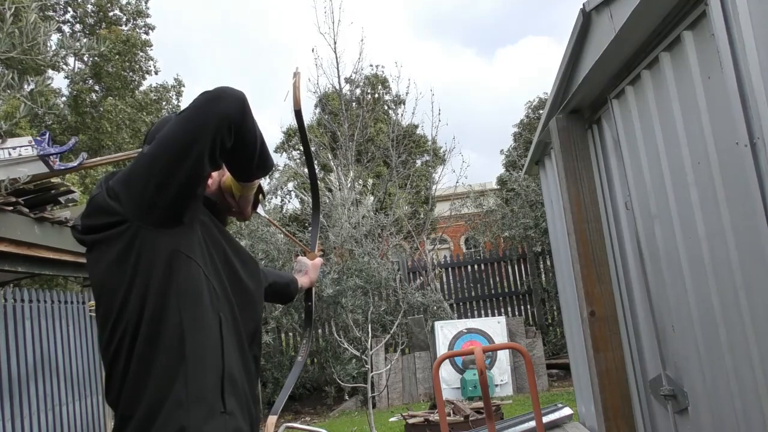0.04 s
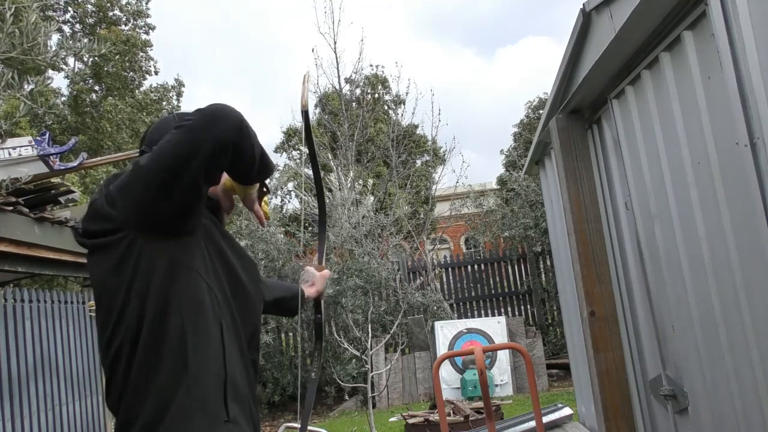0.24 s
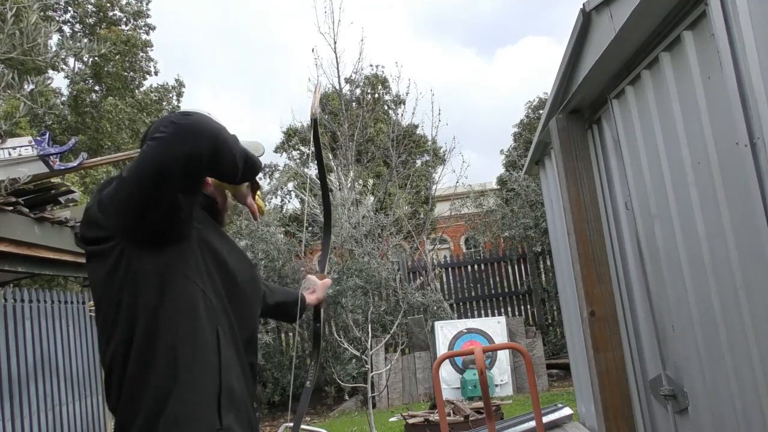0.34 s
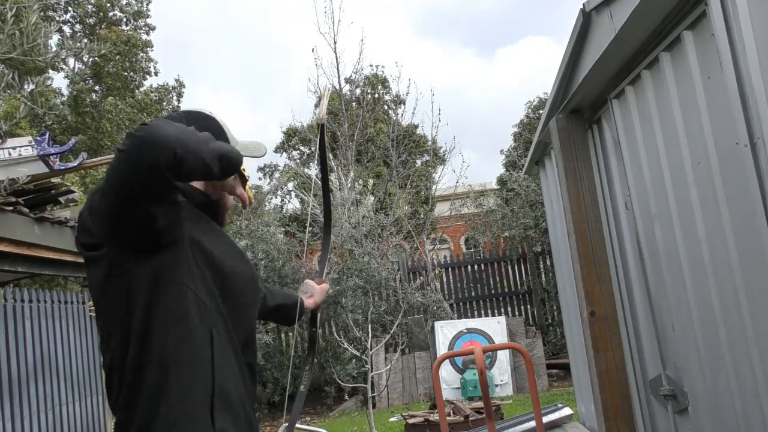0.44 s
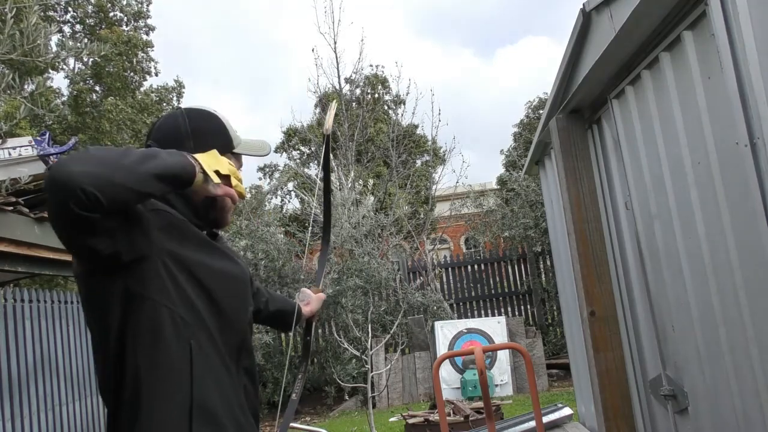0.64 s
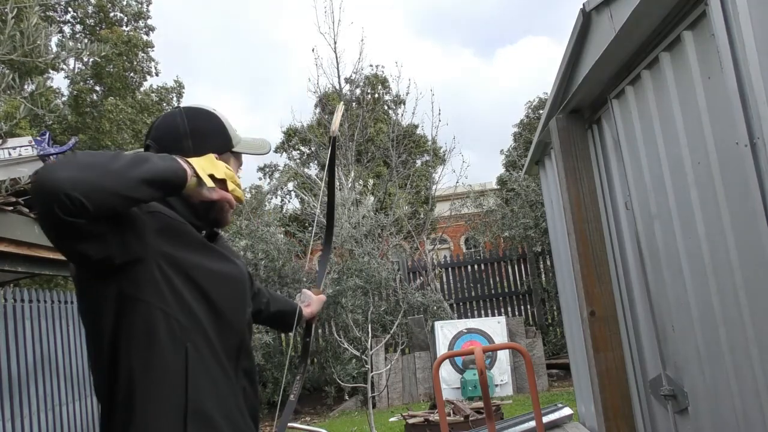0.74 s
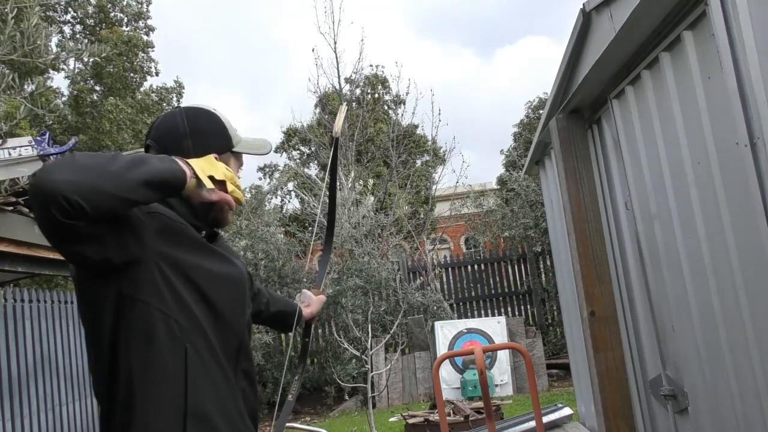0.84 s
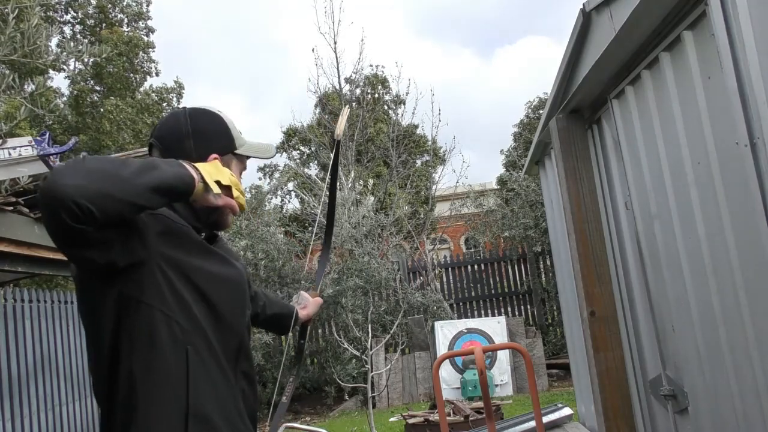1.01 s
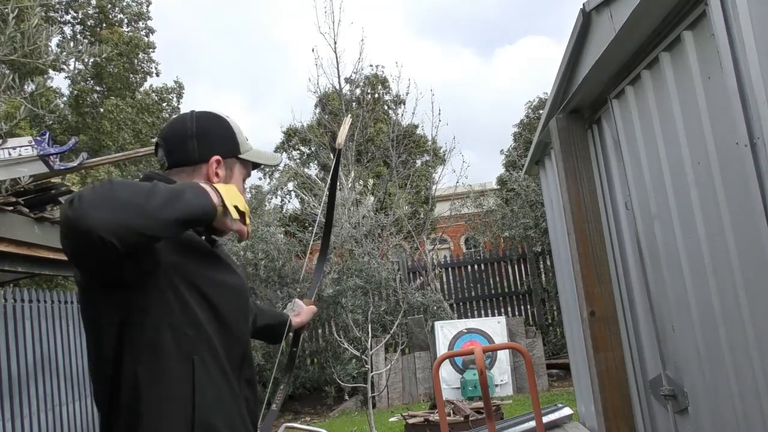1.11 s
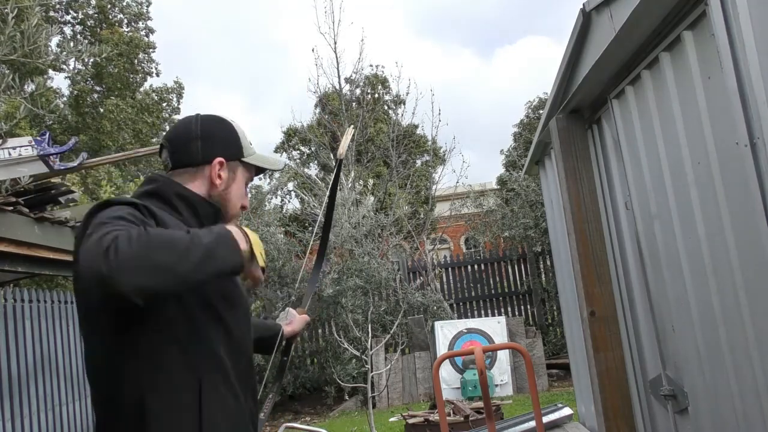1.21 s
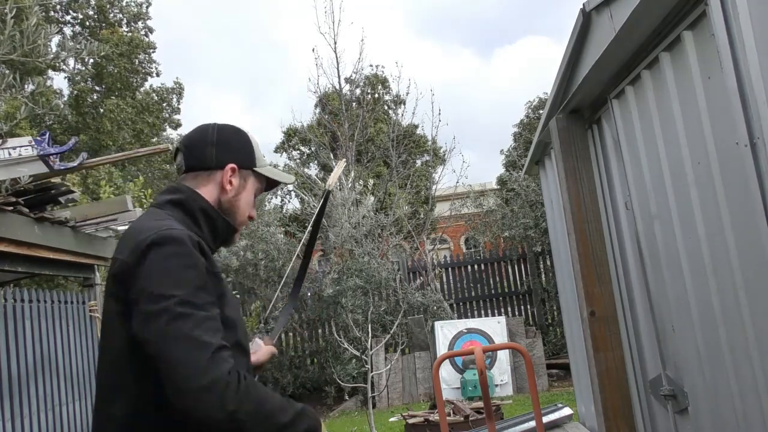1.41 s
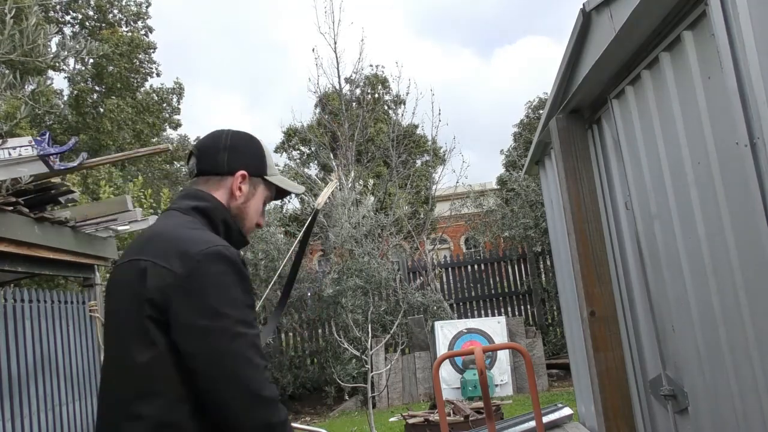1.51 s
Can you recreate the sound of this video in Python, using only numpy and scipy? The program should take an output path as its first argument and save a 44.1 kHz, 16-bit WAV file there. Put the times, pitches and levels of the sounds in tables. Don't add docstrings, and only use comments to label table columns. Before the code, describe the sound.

A bow string snaps on release and the arrow thumps hard into a hollow backyard target

```python
import sys
import numpy as np
from scipy import signal
from scipy.fft import rfft, irfft
from scipy.io import wavfile
from scipy.ndimage import uniform_filter1d

SR = 44100
rng = np.random.default_rng(int(sys.argv[2]) if len(sys.argv) > 2 else 0)


def volts_from_db(level):
    exponent = np.asarray(level, float) / 20
    return 10 ** exponent


def waveform_to_disk(signal):
    frames = np.transpose(np.atleast_2d(signal))
    scaled = np.clip(frames, -1, 1) * 32767
    samples = np.round(scaled).astype(np.int16)
    wavfile.write(sys.argv[1], SR, samples)


N = 68355


def unit(x):
    return x / np.sqrt(np.mean(x ** 2) + 1e-20)


def along(points, hz):
    f, v = np.transpose(points)
    return np.interp(np.log(hz + 1), np.log(f + 1), v)


def closed(points):
    return [(points[0][0] / 2, -90)] + list(points) + [(points[-1][0] * 2, -90)]


def colour(x, points):
    gain = volts_from_db(along(closed(points), np.fft.rfftfreq(4096, 1 / SR)))
    cepstrum = irfft(np.log(gain))
    cepstrum[1:2048] *= 2
    cepstrum[2049:] = 0
    h = irfft(np.exp(rfft(cepstrum)))
    return signal.fftconvolve(x, h / np.linalg.norm(h))[:len(x)]


def add(track, s, x):
    part = track[round(s * SR):][:len(x)]
    part += x[:len(part)]


def burst(t60, rise=0, blow=0):
    t = np.arange(SR // 2) / SR
    swell = 1 - np.exp(-(t + 1 / SR) / (rise + 1e-5))
    x = rng.standard_normal(len(t)) * volts_from_db(-60 * t / t60) * swell
    return x - blow * (t == 0)


def ring(modes):
    t = np.arange(SR // 2) / SR
    return sum(volts_from_db(db - 60 * t / t60) * np.sin(2 * np.pi * hz * t) for hz, db, t60 in modes)


def wide(a, b, width):
    return np.array([a + width * b, a - width * b])


def rush(points, patchy_db):
    # f/Hz, correlation
    alike = [(30, 0.15), (100, 0.56), (1000, 0.78), (5000, 0.6), (6300, 0.94), (8500, 0.91), (12000, 0.85)]
    hz, _, z = signal.stft(rng.standard_normal((2, N)), SR, nperseg=1024)
    field = uniform_filter1d(rng.standard_normal(z.shape[1:]), size=8, axis=0)
    field = uniform_filter1d(field, size=5, axis=1)
    turn = np.arccos(np.clip(along(alike, hz), -1, 1)) / 2
    mid_side_gain = volts_from_db(along(closed(points), hz)) * [np.cos(turn), np.sin(turn)]
    z = z * volts_from_db(patchy_db * unit(field)) * mid_side_gain[..., None]
    mid, side = signal.istft(z, nperseg=1024)[1][:, :N]
    return unit(np.array([mid + side, mid - side]))


def room(x, t60s, gap_s, alike):
    hz, t, z = signal.stft(rng.standard_normal((2, SR // 2)), SR, nperseg=256)
    a, b = signal.istft(z * volts_from_db(-60 * t / along(t60s, hz)[:, None]), SR, nperseg=256)[1]
    b = colour(b, [(40, -9.5), (4500, -3.5), (6500, -24)])
    tail = wide(a, unit(b) * a.std(), 1 - alike)
    tail = tail / np.linalg.norm(tail[0])
    delayed = np.pad(x, (round(gap_s * SR), 0))
    return signal.fftconvolve(delayed[None], tail, axes=1)[:, :N]


def town_floor():
    # f/Hz, level/dB
    rumble = [(25, -23), (104, -5.5), (420, -10.5), (600, -17.5), (800, -24.5), (1050, -14), (1600, -15.5),
              (2500, -29)]
    # f/Hz, level/dB
    hiss = [(2000, 5), (6000, -2.5), (9000, -6.5), (13000, -7.5), (16000, -19)]
    return volts_from_db(-53.5) * rush(rumble, patchy_db=3) + volts_from_db(-55.5) * rush(hiss, patchy_db=0.7)


def wind():
    # t/s, level/dB, t60/s
    gusts = [(0, -51, 0.097), (0.884, -48, 0.061), (1.051, -48, 0.37), (1.151, -52, 0.083),
             (1.34, -52, 0.098)]
    # f/Hz, level/dB
    gust_tone = [(25, 16), (80, 11), (160, 7.5), (300, -18)]
    ports = np.zeros((2, N))
    for s, db, t60 in gusts:
        for port in ports:
            add(port, s, volts_from_db(db + 9.5) * burst(t60, rise=0.011))
    return np.array([colour(port, gust_tone) for port in ports]) * volts_from_db([[1.5], [-1.5]])


def whistle(length_s, from_hz, to_hz):
    u = np.linspace(0, 1, max(round(length_s * SR), 2))
    wobble = unit(uniform_filter1d(rng.standard_normal(SR // 4), size=130))[:len(u)]
    hz = (from_hz + (to_hz - from_hz) * u) * (1 + 0.014 * wobble)
    return np.sin(np.pi * u) ** 0.5 * np.sin(2 * np.pi * np.cumsum(hz) / SR) * np.sqrt(2)


def birds():
    # t/s, length/s, from f/Hz, to f/Hz, level/dB
    notes = [(.012, 0.017, 3840, 3800, -55), (0.025, 0.059, 4420, 5160, -53.5),
             (0.082, .025, 4750, 4600, -55), (.108, .03, 4250, 4210, -52), (.122, .045, 3360, 3650, -49),
             (0.167, .015, 4600, 4470, -55), (0.18, 0.043, 4250, 4050, -54),
             (0.185, 0.024, 3350, 3620, -52), (0.505, 0.019, 3350, 3590, -45), (.53, .014, 3070, 3030, -50),
             (0.536, 0.051, 3480, 3590, -46), (0.556, 0.021, 4270, 4190, -48.5),
             (0.584, 0.039, 3600, 3215, -50), (0.623, 0.0417, 3225, 3070, -49.5),
             (.675, .025, 3100, 3120, -49.5), (0.696, 0.044, 5280, 4520, -53.5),
             (.705, 0.045, 6180, 5750, -56.5), (0.876, 0.029, 5230, 5270, -53),
             (1.003, 0.018, 4150, 4110, -49.5), (1.063, 0.043, 4735, 4600, -52),
             (1.107, 0.083, 3503, 3684, -51), (0.372, .02, 5000, 5000, -51),
             (1.253, 0.023, 3800, 3100, -48), (1.292, 0.021, 3656, 3910, -46),
             (1.334, 0.029, 5290, 5260, -51.5), (1.389, 0.021, 5010, 3520, -46),
             (1.419, 0.019, 3454, 3970, -42.5), (1.425, 0.034, 4550, 4756, -44),
             (1.44, 0.011, 3645, 3600, -44), (1.45, 0.043, 4700, 4660, -51.5)]
    # t/s, level/dB
    chorus = [(0, -47), (.4, -47.5), (.62, -48.5), (0.821, -54.5), (1.0, -52.5), (1.12, -49), (1.21, -51.5),
              (1.28, -46), (1.42, -48), (1.55, -55)]
    # f/Hz, level/dB
    flock_tone = [(2400, -48), (2900, -3.5), (3500, 0), (4600, -3.5), (5500, -10.5), (6500, -25.5)]
    # t/s, half of left minus right/dB
    flock_pan = [(0, -3), (.3, -3.5), (.9, -2), (1.2, -3), (1.55, -2)]
    near, far = np.zeros((2, N))
    for s, length_s, from_hz, to_hz, db in notes:
        add(near, s, volts_from_db(db) * whistle(length_s, from_hz, to_hz))
    for when, long, pitch, glide in rng.random((160, 4)):
        hz = 2900 + 2600 * pitch
        chirp = whistle(0.0117 + 0.0298 * long, hz, hz * (0.88 + 0.2287 * glide))
        add(far, when * N / SR, volts_from_db(along(flock_tone, hz)) * chirp)
    chirps = unit(room(far, [(4000, 0.39)], gap_s=0, alike=0.58))
    flock = rush(flock_tone, patchy_db=5.0) + volts_from_db(-3) * chirps
    trees = volts_from_db(-8) * room(near, [(4000, 0.2)], gap_s=0.012, alike=0.51)
    t = np.arange(N) / SR
    flock_db = np.interp(t, *np.transpose(chorus)) - 0.5
    pan_db = np.interp(t, *np.transpose(flock_pan))
    return volts_from_db([pan_db, -pan_db]) * (near + trees + volts_from_db(flock_db) * flock)


def jacket():
    # t/s, level/dB, rise/s, t60/s
    rustles = [(0.581, -48, .012, 0.16), (0.757, -34.5, 0.002, 0.14), (0.773, -33, 0.0015, 0.18),
               (0.887, -44.5, 0.026, 0.33), (0.927, -40.5, 0.006, 0.095), (1.22, -42.5, 0.0095, 0.1)]
    # f/Hz, level/dB
    cloth_tone = [(470, -61), (800, -6), (1000, -5), (1850, 4), (2040, 1), (2460, 1.5), (10700, 6.5),
                  (15800, 1)]
    # t/s, peak level/dB
    tick_events = [(1.0028, -40.5), (1.0244, -36)]
    # f/Hz, level/dB
    tick_tone = [(5000, -6), (8000, -12), (12000, 2), (15500, -15)]
    # t/s, level/dB, t60/s
    knock_events = [(0.9151, -31, 0.028), (1.146, -34.5, 0.028)]
    # f/Hz, level/dB
    knock_tone = [(280, 8), (450, 6), (1100, 1), (1600, -10)]
    x, other, ticks, knocks = np.zeros((4, N))
    for s, db, rise, t60 in rustles:
        add(x, s, volts_from_db(db) * burst(t60, rise))
        add(other, s, volts_from_db(db) * burst(t60, rise))
    for s, db in tick_events:
        add(ticks, s, volts_from_db(db) * burst(0.011, blow=3.3))
    for s, db, t60 in knock_events:
        add(knocks, s, volts_from_db(db) * burst(t60, rise=0.0058))
    grain = unit(volts_from_db(1.5 * unit(uniform_filter1d(rng.standard_normal(N), size=60))))
    cloth = wide(colour(x * grain, cloth_tone), colour(other * grain, cloth_tone), 0.27)
    return cloth + volts_from_db([[1.2], [-1.2]]) * colour(ticks, tick_tone) + colour(knocks, knock_tone)


def booms():
    # t/s, peak level/dB, f/Hz, swell/s
    pushes = [(0.429, -12, 128.8, .011), (0.464, -19.5, 163.4, 0.011), (0.496, -27.5, 155, 0.01),
              (.52, -41, 136, 0.013), (0.545, -33, 146, 0.01), (0.575, -31.5, 229, 0.0079),
              (0.582, -35, 111, 0.01), (0.604, -34, 254, 0.012), (0.623, -22.5, 146.8, 0.0097),
              (0.661, -30.5, 133, 0.0044), (0.682, -33, 140, 0.0055), (.75, -47, 183.4, 0.024),
              (.772, -41, 137, 0.008), (1.075, -44, 103.5, 0.011), (1.12, -40.5, 81, .009)]
    x, t = np.zeros(N), np.arange(SR // 4) / SR
    for s, db, hz, swell in pushes:
        u = t / swell
        add(x, s, -volts_from_db(db) * u ** 2 * np.exp(2 - 2 * u) * np.sin(2 * np.pi * hz * t))
    return x


def target():
    # t/s, level/dB, t60/s
    layers = [
        (0.4278, -18.5, 0.0059),
        (.4314, -21, 0.008),
        (.4327, -19.5, 0.0065),
        (0.436, -24.5, 0.0052),
    ]
    # f/Hz, level/dB
    hit_tone = [(600, -9), (1000, -18), (1500, -2.5), (2600, 0.5), (3900, -0.5), (4700, -19), (5800, -13),
                (15500, -33)]
    # f/Hz, level/dB, t60/s
    face_modes = [(332, -17.5, 0.063), (387, -26.5, 0.14), (428, -38, 0.21), (561, -37.5, 0.1),
                  (84, -39, 0.31)]
    # f/Hz, level/dB, t60/s
    tip_modes = [(2700, -7, .005), (1650, -14, .01), (3700, -14, .004)]
    hit_s, tip_rise_s = 0.4277, 0.0003
    cracks, face = np.zeros((2, N))
    for s, db, t60 in layers:
        add(cracks, s, volts_from_db(db) * burst(t60, blow=0.66))
    add(cracks, hit_s + 0.00179, volts_from_db(-27.5) * burst(0.049, rise=0.0025))
    add(face, hit_s + 0.00086, ring(face_modes))
    tip_swell = 1 - np.exp(-np.arange(SR // 2) / SR / tip_rise_s)
    add(face, hit_s, -ring(tip_modes) * tip_swell)
    high_pass = signal.butter(2, 60, "high", fs=SR, output="sos")
    return colour(cracks, hit_tone) + signal.sosfilt(high_pass, face)


def bow():
    # t/s, peak level/dB, brightness above 6 kHz/dB, t60/s
    snaps = [(0.2198, -26, -20, 0.014), (0.2241, -16.5, -2, 0.018), (0.2250, -17, 8, 0.0096),
             (0.2278, -19.5, -8, 0.0079), (0.2381, -15, 2, 0.015), (.2410, -26, -3, 0.039),
             (0.2486, -23, -12, 0.025)]
    # f/Hz, level/dB
    snap_tone = [(430, -9), (760, -12), (1100, -0.5), (1750, -12), (2300, 1), (4200, -3), (6000, -9.5),
                 (15500, -16.5)]
    # f/Hz, level/dB, t60/s
    limb_modes = [(127, -2, 0.0088), (1136, -11, 0.06), (2205, -3, 0.034), (3100, -5, 0.028)]
    # f/Hz, level/dB, t60/s
    scrape_modes = [(904, -25.5, 0.034), (1114.4, -23.5, 0.068), (4600, -21.5, 0.0078), (416, -29, 0.029)]
    # f/Hz, level/dB, t60/s
    slap_modes = [(2370, -16, 0.0087), (2820, -11.5, 0.01), (3430, -14.5, 0.009), (3860, -18.5, 0.013),
                  (11200, -9.5, 0.0023), (14000, -19, 0.0018)]
    # f/Hz, level/dB, t60/s
    rebound_modes = [(2470, -13, 0.0062)]
    dull, bright, other, limbs = np.zeros((4, N))
    for s, db, bright_db, t60 in snaps:
        add(dull, s, volts_from_db(db - 4.0) * burst(t60, blow=1.7))
        add(bright, s, volts_from_db(db + bright_db - 10) * burst(0.25 * t60, blow=1.9))
        add(other, s, volts_from_db(db + bright_db - 3) * burst(0.27 * t60))
        add(limbs, s, -volts_from_db(db - 11.5) * ring(limb_modes))
    add(limbs, 0.2229, -ring(scrape_modes))
    add(limbs, 0.2378, -ring(slap_modes))
    add(limbs, 0.2466, -ring(rebound_modes))
    add(dull, 0.219, volts_from_db(-21) * burst(0.14, rise=0.0061))
    fizz_tone = [(5000, -6), (8000, 4), (11500, 5), (16000, -10.5)]
    fizz = wide(colour(bright, fizz_tone), colour(other, fizz_tone), 0.2)
    return colour(dull, snap_tone) + limbs + fizz


def lawn(x):
    return x - 0.65 * signal.lfilter(*signal.iirpeak(757, 3.1, SR), x)


def yard(shot):
    t60s = [(300, 0.65), (2500, 0.26), (6000, 0.57), (14000, 0.1)]
    return volts_from_db(-12) * room(shot.mean(axis=0), t60s, gap_s=0.015, alike=0.72)


def fence(hit, boom):
    answer = volts_from_db(-12.5) * room(hit, [(300, 0.86), (2000, 0.56), (8000, 0.48)], gap_s=0.014, alike=0.84)
    answer = answer + volts_from_db(-16.0) * room(boom, [(150, 0.8)], gap_s=0.019, alike=0.88)
    return answer + volts_from_db(-7.5) * np.roll(answer, round(0.165 * SR), axis=1)


def scene():
    shot, boom, hit = lawn(bow()), booms(), target()
    direct = shot * volts_from_db([[-0.5], [0.5]]) + (hit + boom) * volts_from_db([[0.4], [-0.4]])
    background = town_floor() + wind() + birds() + jacket()
    return direct + yard(shot) + fence(hit, boom) + background


def band_limit(x):
    return signal.sosfilt(signal.butter(12, 16620, fs=SR, output="sos"), x)


def record(dry):
    # f/Hz, left lead/rad
    ports = [(300, 0.18), (4000, 0.94), (6300, 0.027), (8500, 0.077), (11000, 0.67)]
    lead = along(ports, np.fft.rfftfreq(N, 1 / SR))
    shifted = irfft(rfft(dry) * np.exp(0.5j * lead * np.array([[1], [-1]])), N)
    low_pass = signal.ellip(8, 0.1, 70, 15700, fs=SR, output="sos")
    return band_limit(signal.sosfilt(low_pass, shifted))


dry = scene()
out = record(dry)
waveform_to_disk(out)
```